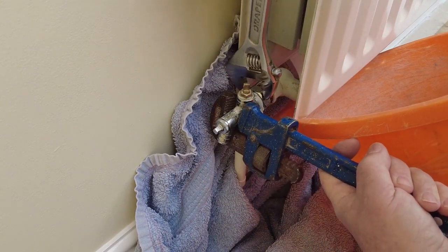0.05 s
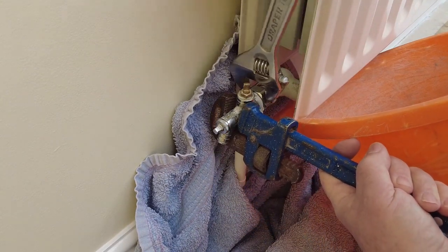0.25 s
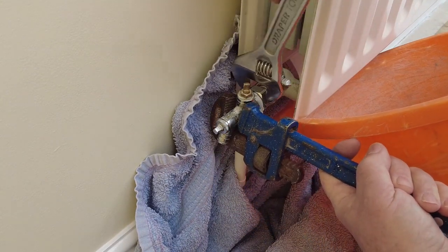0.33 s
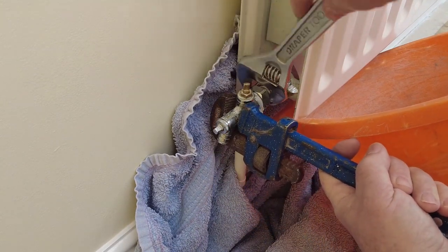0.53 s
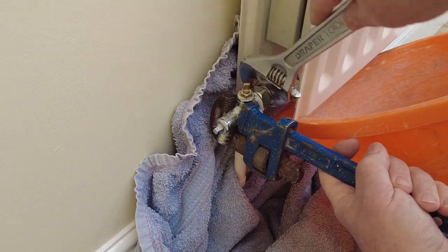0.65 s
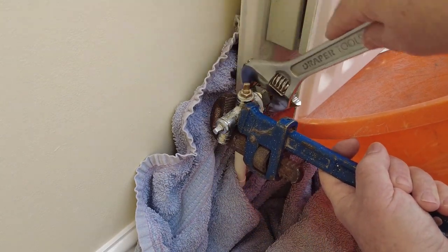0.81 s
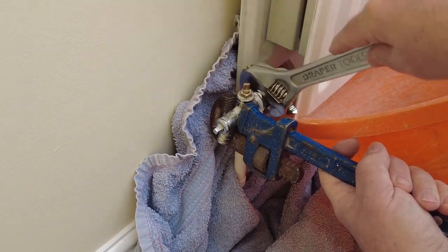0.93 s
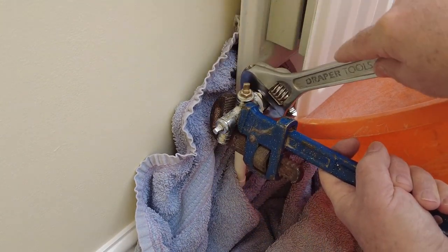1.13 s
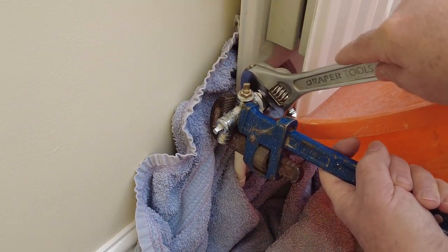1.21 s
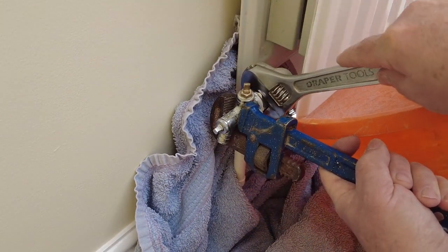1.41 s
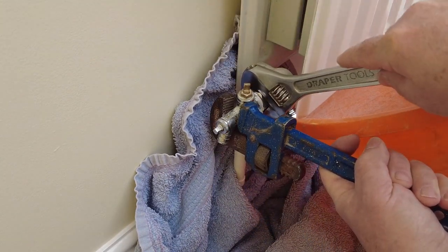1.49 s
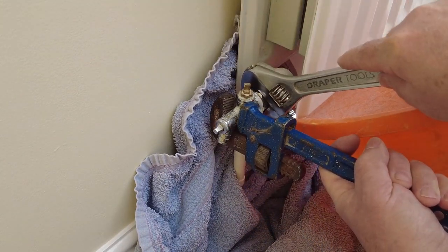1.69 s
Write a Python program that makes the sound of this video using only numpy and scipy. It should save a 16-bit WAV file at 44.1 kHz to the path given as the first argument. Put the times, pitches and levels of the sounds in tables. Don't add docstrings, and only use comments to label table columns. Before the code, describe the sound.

Wrench jaw slips on a tight pipe nut with a sharp metallic clatter after brief grinding

```python
import sys
import numpy as np
from scipy import signal
from scipy.fft import rfft, irfft, next_fast_len
from scipy.io import wavfile

SR = 44100
rng = np.random.default_rng(int(sys.argv[2]) if len(sys.argv) > 2 else 0)


def volts_from_decibels(level):
    exponent = np.asarray(level, float) / 20
    return 10 ** exponent


def waveform_to_disk(signal):
    frames = np.transpose(np.atleast_2d(signal))
    scaled = np.clip(frames, -1, 1) * 32767
    samples = np.round(scaled).astype(np.int16)
    wavfile.write(sys.argv[1], SR, samples)


N = 77175

# time in seconds, pitch in Hz, level in dB.
SWAY = [(0.0, 39.9, -44), (0.252, 37.9, -39.5), (0.32, 43.6, -52.5), (0.442, 40.3, -35.5),
        (0.648, 40.8, -44.5), (0.774, 42.25, -32), (0.838, 37, -41), (0.92, 27.2, -50.5),
        (1.018, 23.2, -39.5), (1.11, 27.34, -43.5), (1.21, 24.95, -40), (1.27, 30.1, -60),
        (1.394, 31.5, -43.5), (1.5, 38.2, -42.5), (1.686, 44.4, -68), (1.75, 45, -44)]
# pitch in Hz, width in Hz, level in dB.
THRUM = [(81.56, 23.3, -55), (103.7, 2.37, -62.5)]
# time in seconds, level in dB.
THRUM_SWELL = [(0.05, -61.5), (0.186, -58), (0.3, -61.5), (0.748, -64.5), (0.808, -47.5), (0.858, -59.5),
               (0.982, -59.5), (1.3, -60.5), (1.534, -63.5), (1.7, -62)]
# pitch in Hz, width in Hz, level in dB.
RUMBLE = [(23.2, 7.8, -48), (53.1, 39, -51), (135, 86, -66)]
# start in seconds, length in seconds, pitch in Hz, peak in dB.
JOLTS = [
    (.955, .12, 69.5, -37),
    (1.15, .16, 70, -43),
    (1.08, .08, 100, -45),
    (.87, .12, 98, -48),
]
BASS_PAN_DB = -1.2

# frequency in Hz, level in dB.
HISS_SPECTRUM = [(65, -33), (110, -17.5), (231, -22.5), (266, -12.5), (308, -8.5), (436, -8), (1060, -12.5),
                 (1770, -21), (15000, -38.5)]
# frequency in Hz, left-right likeness from -1 to 1.
LIKENESS = [(60, 0.79), (240, 0.61), (930, 0.047), (3690, 0.32), (14500, 0.54)]
HISS_DB, HISS_TOP_HZ = -67, 10400

# start in seconds, length in seconds, pitch in Hz, level in dB.
SQUEAK = [(.712, .045, 853, -55), (.755, .07, 855, -62), (.68, .27, 1785, -69), (.915, .09, 850, -48),
          (0, .15, 1790, -79), (.24, .14, 2150, -75), (.1, .85, 264, -65), (.3, .14, 437, -58),
          (1.05, .33, 263, -46), (1.3, .55, 263, -50), (1.1, .8, 204, -58), (.96, .11, 434, -44),
          (.9, .06, 1070, -55), (1.005, .045, 1210, -53), (.895, .04, 740, -56), (.72, .05, 2130, -72),
          (1.404, .028, 434, -37), (1.388, .022, 590, -42), (1.46, .055, 1220, -60)]
SQUEAK_WIDTH_HZ, SQUEAK_ROUGH = 40, .4
# start in seconds, length in seconds, centre in Hz, width in Hz,
# level in dB.
RASP = [(0.87, 0.14, 2910, 300, -60.5), (0.828, 0.18, 2050, 310, -66.5), (0.837, 0.17, 4900, 4000, -73.5),
        (.99, 0.095, 2900, 330, -70.5), (0.692, 0.089, 2880, 500, -76), (1.6, .02, 4100, 760, -72),
        (1.583, .018, 1500, 68, -75), (1.9, .06, 2500, 200, -70.5), (0.44, 0.23, 610, 380, -68.5),
        (1.034, 0.18, 5600, 2100, -69.5), (1.083, .012, 15000, 2400, -57), (0.277, 0.16, 636, 370, -63.5),
        (1.712, 0.02, 2100, 820, -69)]

# time in seconds, level in dB, brightness in Hz.
GRIND = [(0.03, -66, 1520), (0.078, -84, 1500), (0.082, -98, 1490), (0.142, -69.5, 1600),
         (0.356, -54.5, 1430), (0.52, -69, 1360), (0.706, -53.5, 1520), (0.726, -55.5, 1610),
         (0.866, -57.5, 1620), (0.9, -51, 1530), (0.952, -41, 1430), (1.026, -41, 1558),
         (1.045, -45.5, 1500)]
GRAINS_PER_S, GRAIN_SPREAD_DB, GRIND_DB = 3000, 4.5, 1.5
# frequency in Hz, level in dB.
GRIND_REACH = [(200, -24), (330, -31), (440, 0), (600, 0), (880, 2), (1550, -8), (2100, 5), (3000, 2)]
# time in seconds, strength in dB, pitch struck best in Hz,
# rattle after it in seconds.
KNOCKS = [(1.048, -29.5, 3300, 0.03), (1.05, -23.5, 538, 0.006), (1.052, -28.5, 1730, 0.012),
          (1.056, -25, 2780, 0.0059), (1.061, -25.5, 583, 0.012), (1.067, -27.5, 2050, 0.005),
          (1.069, -23.5, 620, 0.013), (1.074, -22.5, 404, 0.011), (1.086, -20.5, 3000, 0.0073),
          (1.091, -31, 710, 0.0055), (1.097, -31.5, 1166, 0.017), (1.103, -24, 3170, 0.0095),
          (1.11, -32.5, 434, 0.022), (1.117, -35, 1990, 0.013), (1.135, -35.5, 2760, 0.0054),
          (1.146, -34, 724, 0.0095), (1.158, -36.5, 560, 0.021), (1.169, -43.5, 593, 0.026),
          (1.2, -50, 1960, 0.031), (1.501, -55, 580, 0.072), (1.384, -50.5, 2780, 0.02),
          (1.384, -46.5, 1880, 0.013), (1.389, -42.5, 1220, 0.0088), (1.396, -36.5, 603, 0.0031),
          (1.41, -35, 434, 0.0075), (1.445, -47.5, 650, 0.032), (1.47, -65.5, 1235, 0.026),
          (1.719, -53.5, 1620, 0.0016)]
BLOW_DB, RATTLE_DB = -2, -8.5
FOCUS_DB_PER_OCTAVE = 12.5
# frequency in Hz, level in dB, t60 in seconds.
PIPE = [(434, -2, 0.14), (466.2, -13.5, 0.3), (581.9, -8, 0.27), (674.6, -6, 0.098), (779.3, -5, 0.12),
        (856, -8.5, 0.1), (1073.5, 2, 0.033), (1226.3, -2, 0.12), (1580, -8.5, 0.063), (1812, -5, 0.031),
        (1954, -6.5, 0.023), (2780, -12.5, 0.039), (2992, -15, 0.048), (3196, -22.5, 0.15)]
# frequency in Hz, level in dB, t60 in seconds.
PANEL = [(207.5, -22.5, 1.9), (263, -18.5, 0.91), (299, -20, 0.067)]
# frequency in Hz, level in dB.
SHEET = [(200, -19), (360, -42), (441, -10.5), (800, -12), (1330, -11.5), (2300, -22), (3050, -16.5),
         (4200, -43)]
SHEET_DB, SHEET_T60_S, SHEET_DAMPING = -9, 0.19, 0.93
BODY_LOW_HZ, BODY_HIGH_HZ = 167, 3350

# time in seconds, level in dB.
SLEEVE = [(0.22, -78), (0.23, -94), (0.298, -84), (0.334, -72), (0.366, -76), (0.42, -90)]
SLEEVE_LOW_HZ, SLEEVE_HIGH_HZ = 4180, 9900

# time in seconds, strength in dB.
TICKS = [
    (1.008, -69),
    (1.048, -50),
    (1.052, -71),
    (1.086, -42.5),
    (1.099, -56.5),
]
# frequency in Hz, level in dB, t60 in seconds.
SPANNER = [(4930, 11, 0.023), (6406, 11.5, 0.029), (7220, 3.5, 0.028), (7400, -15, 0.074),
           (10800, -25, 0.052), (9900, -22, 0.1), (10640, -51, 0.25), (12040, -26, 0.098),
           (11170, -37, 0.066), (12400, -9, 0.058), (12940, -10, 0.079), (14300, -15, 0.049)]
STEEL_RING_DB = -4.5
CRACK_DB, CRACK_S, CRACK_HZ, CRACK_TOP_HZ = 6.5, 0.0042, 3380, 8750
CRACK_TAIL_DB, CRACK_TAIL_S = -21, 0.047
GRIT_DB = -41.5

WORK_PAN_DB, SPREAD_RAD, SPREAD_DB = 0.56, 1.1, 1.5
ROOM_T60_S, ROOM_DB, WALL_CUT_HZ = 0.67, -19.5, 5840
SIDES = np.array([[1], [-1]])


def rms_one(x):
    return x / np.sqrt(np.mean(x ** 2) + 1e-20)


def in_time(rows, outside=None):
    s, *columns = np.transpose(rows)
    return [np.interp(np.arange(N) / SR, s, c, outside, outside) for c in columns]


def at_hz(points, hz):
    table_hz, value = np.transpose(points)
    return np.interp(np.log(hz), np.log(table_hz), value)


def swell(s, length):
    return np.sin(np.pi * np.clip((np.arange(N) / SR - s) / length, 0, 1))


def bandpass(x, order, low_hz, high_hz):
    return signal.sosfilt(signal.butter(order, [low_hz, high_hz], "band", fs=SR, output="sos"), x)


def narrow(hz, width_hz):
    r = np.exp(-np.pi * width_hz / SR)
    a = [1, -2 * r * np.cos(2 * np.pi * hz / SR), r * r]
    once = signal.lfilter([1, 0, -1], a, rng.standard_normal(N + SR))
    return rms_one(signal.lfilter([1], a, once)[SR:])


def ring(force, hz, t60):
    pole = volts_from_decibels(-60 / (t60 * SR)) * np.exp(2j * np.pi * hz / SR)
    turn, tilt = np.clip(rng.normal(0, 1, 2), -1.3, 1.3)
    mode = signal.lfilter([1], [1, -pole], force + 1e-18)
    heard = np.imag(mode * np.exp(.5j * SPREAD_RAD * turn * SIDES))
    return heard * volts_from_decibels(.5 * SPREAD_DB * tilt * SIDES)


def bass():
    hz, db = in_time(SWAY)
    sway = np.sqrt(2) * volts_from_decibels(db) * np.sin(2 * np.pi * np.cumsum(hz) / SR + 1.43)
    load_db, = in_time(THRUM_SWELL)
    thrum = sum(volts_from_decibels(level_db) * narrow(f, width_hz) for f, width_hz, level_db in THRUM)
    rumble = sum(volts_from_decibels(level_db) * narrow(f, width_hz) for f, width_hz, level_db in RUMBLE)
    jolts = 0
    for s, length, f, peak_db in JOLTS:
        jolts = jolts + volts_from_decibels(peak_db) * swell(s, length) * np.sin(2 * np.pi * f * np.arange(N) / SR)
    low = sway + jolts + volts_from_decibels(load_db - load_db.mean()) * thrum + rumble
    return low * volts_from_decibels(BASS_PAN_DB * SIDES)


def hiss():
    out, edges = 0, 110 * 2 ** np.arange(0, 7.1, .5)
    white = rng.standard_normal((2, 2, N))
    for k, (low, high) in enumerate(zip(edges, edges[1:])):
        centre_hz = np.sqrt(low * high)
        mid, side = bandpass(white[k % 2], 2, low, high)
        alike = np.clip(at_hz(LIKENESS, centre_hz), -1, 1)
        pair = np.sqrt(1 + alike) * mid + np.sqrt(1 - alike) * side * SIDES
        out = out + volts_from_decibels(at_hz(HISS_SPECTRUM, centre_hz)) * pair
    lowpass = signal.butter(4, HISS_TOP_HZ, fs=SR, output="sos")
    return volts_from_decibels(HISS_DB) * rms_one(signal.sosfilt(lowpass, out))


def squeak():
    phase, out = 2 * np.pi * np.arange(N) / SR, 0
    for s, length, hz, db in SQUEAK:
        tone = np.sin(phase * hz + .5 * SIDES * rng.choice([-1, 1]) * SPREAD_RAD)
        rough = SQUEAK_ROUGH * narrow(hz, SQUEAK_WIDTH_HZ)
        out = out + volts_from_decibels(db) * swell(s, length) * (tone + rough)
    return out


def rasp():
    out = 0
    for s, length, hz, width_hz, db in RASP:
        scrape = narrow(hz, width_hz) + .65 * SIDES * narrow(hz, width_hz)
        out = out + volts_from_decibels(db) * swell(s, length) * scrape
    return out


def grains():
    sizes = volts_from_decibels(GRAIN_SPREAD_DB * np.minimum(rng.exponential(1, N), 4)) * rng.choice([-1, 1], N)
    return rms_one(sizes * (rng.random(N) < GRAINS_PER_S / SR))


def knock_bursts(rattle_s):
    t = np.arange(int(.08 * SR)) / SR
    rough = np.tile(grains()[:len(t)], (len(rattle_s), 1))
    shakes = rng.permuted(rough, axis=1)
    bursts = []
    for decay, shake in zip(rattle_s, shakes):
        rattle = volts_from_decibels(RATTLE_DB - 11.5) * np.exp(-t / max(decay, 1e-3)) * shake
        bursts.append(rattle + volts_from_decibels(BLOW_DB) * (t == 0))
    return bursts


def radiator():
    sheet_hz = 300 + (np.arange(110) + rng.random(110)) * 30
    sheet = [(hz, SHEET_DB + at_hz(SHEET, hz), SHEET_T60_S * (1000 / hz) ** SHEET_DAMPING)
             for hz in sheet_hz]
    grind_db, bright_hz = in_time(GRIND)
    turning = np.arange(N) < GRIND[-1][0] * SR
    grind = volts_from_decibels(grind_db + GRIND_DB - 31.5) * turning * grains()
    s, db, centre_hz, rattle_s = np.transpose(KNOCKS)
    bursts, out = knock_bursts(rattle_s), 0
    for hz, level_db, t60 in PIPE + PANEL + sheet:
        thread = volts_from_decibels(at_hz(GRIND_REACH, hz)) * grind / (1 + (hz / bright_hz) ** 2)
        force = np.concatenate([thread, np.zeros(SR)])
        off_pitch_db = FOCUS_DB_PER_OCTAVE * abs(np.log2(hz / centre_hz))
        strength = volts_from_decibels(db + 2 * rng.standard_normal(len(s)) - off_pitch_db) * rng.choice([-1, 1])
        for at, size, burst in zip((s * SR).astype(int), strength, bursts):
            force[at:at + len(burst)] += size * burst
        out = out + volts_from_decibels(level_db) * ring(force[:N], hz, t60)
    return bandpass(out, 4, BODY_LOW_HZ, BODY_HIGH_HZ)


def sleeve():
    noise = rng.standard_normal(N) + .5 * rng.standard_normal((2, N))
    swish = rms_one(bandpass(noise, 2, SLEEVE_LOW_HZ, SLEEVE_HIGH_HZ))
    return volts_from_decibels(in_time(SLEEVE, outside=-120)[0]) * swish


def spanner():
    s, db = np.transpose(TICKS)
    out, clicks = 0, np.zeros(N)
    clicks[(s * SR).astype(int)] = volts_from_decibels(db)
    for hz, level_db, t60 in SPANNER:
        uneven = clicks * volts_from_decibels(2.0 * rng.standard_normal(N))
        out = out + volts_from_decibels(level_db + STEEL_RING_DB) * ring(uneven, hz, t60)
    fade = volts_from_decibels(in_time(GRIND, outside=-120)[0] + GRIT_DB)
    for level_db, tau in [(0, CRACK_S), (CRACK_TAIL_DB, CRACK_TAIL_S)]:
        fade = fade + volts_from_decibels(level_db) * signal.lfilter([1], [1, -np.exp(-1 / (tau * SR))], clicks)
    noise = rng.standard_normal(N) + 1.1 * rng.standard_normal((2, N))
    return out + volts_from_decibels(CRACK_DB) * bandpass(fade * noise, 2, CRACK_HZ, CRACK_TOP_HZ)


def room(x):
    size = next_fast_len(N + SR)
    hz = np.arange(size // 2 + 1) * SR / size
    spectrum, out = rfft(x, size), np.zeros((2, N))
    for k, lag in enumerate(rng.uniform(.008, 0.028, 12)):
        wall = volts_from_decibels(-60 * lag / ROOM_T60_S) / (1 + 1j * hz / WALL_CUT_HZ)
        loop = wall * np.exp(-2j * np.pi * hz * lag)
        echoes = irfft(spectrum * loop / (1 - loop), size)[:N]
        out[k % 2] += echoes * (-1) ** (k // 2)
    return out


def scene():
    work = (radiator() + spanner() + squeak() + rasp()) * volts_from_decibels(WORK_PAN_DB * SIDES)
    return work + volts_from_decibels(ROOM_DB) * room(work.mean(axis=0)) + sleeve() + bass() + hiss()


def top_cut(x):
    return signal.sosfilt(signal.butter(12, 15140, fs=SR, output="sos"), x)


def record(dry):
    return top_cut(dry)


dry = scene()
out = record(dry)
waveform_to_disk(out)
```